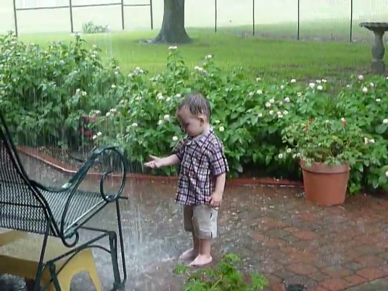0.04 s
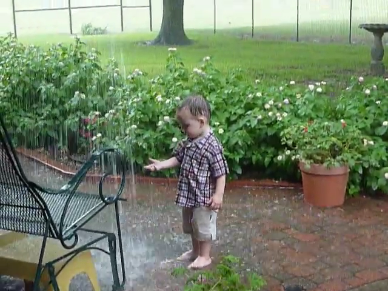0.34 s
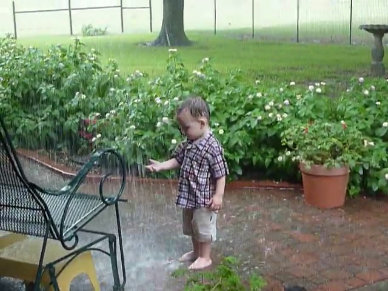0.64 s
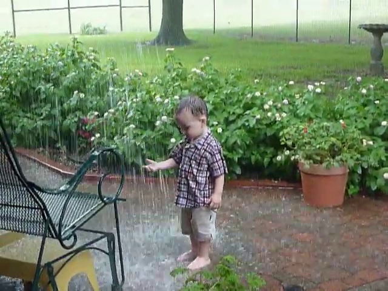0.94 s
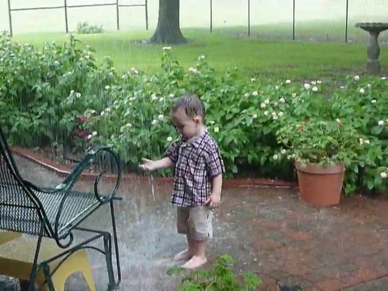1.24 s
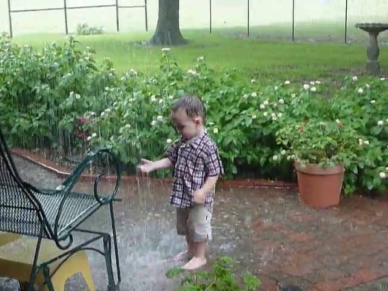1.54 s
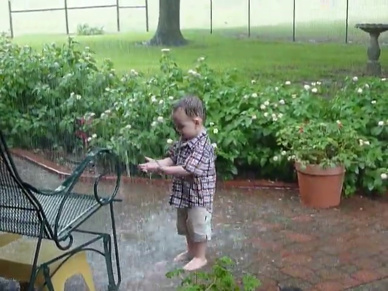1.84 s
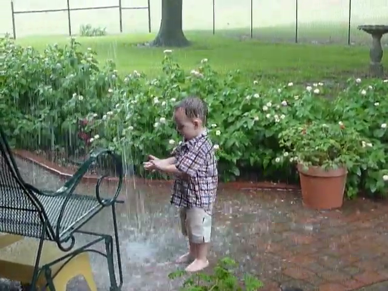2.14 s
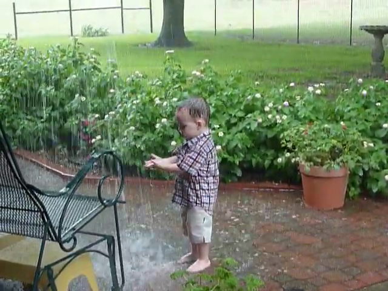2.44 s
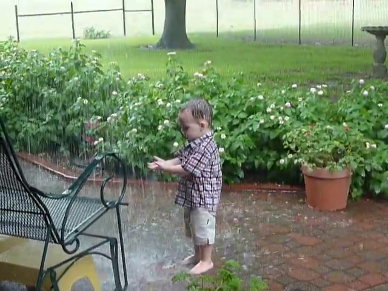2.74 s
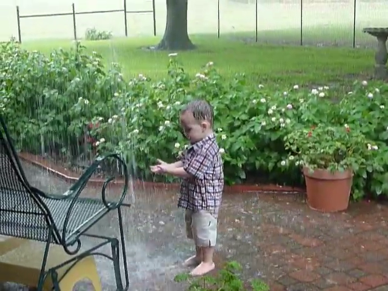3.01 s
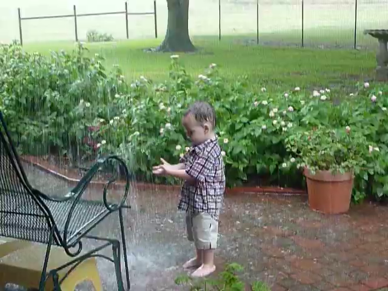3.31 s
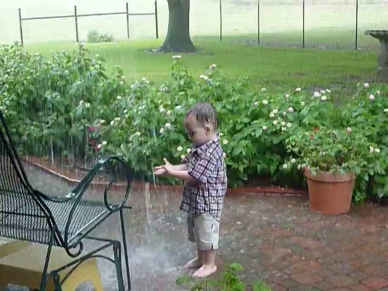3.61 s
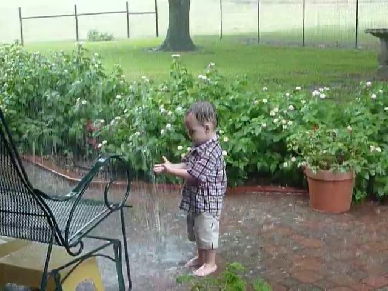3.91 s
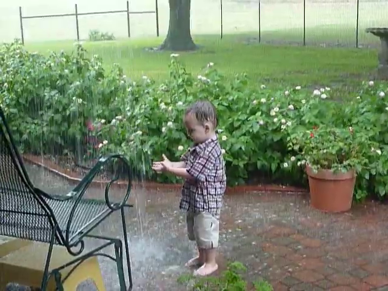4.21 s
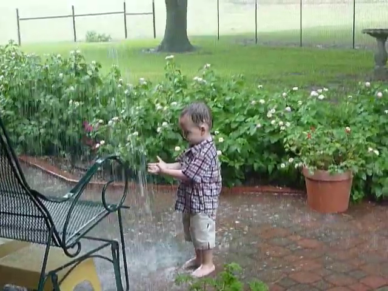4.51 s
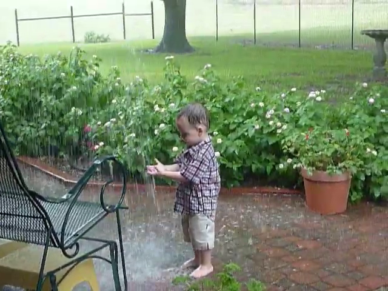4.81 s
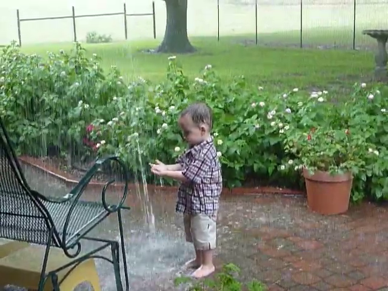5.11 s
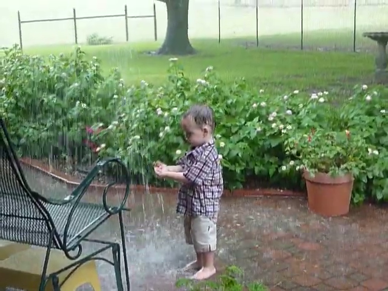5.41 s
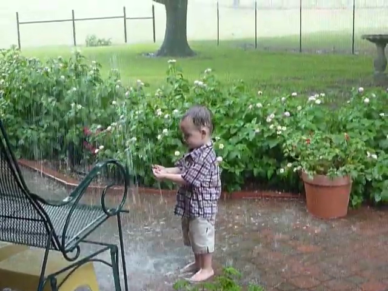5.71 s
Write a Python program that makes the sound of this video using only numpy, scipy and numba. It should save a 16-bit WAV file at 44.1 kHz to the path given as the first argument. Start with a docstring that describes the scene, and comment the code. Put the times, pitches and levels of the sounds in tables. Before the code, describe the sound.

Heavy rain falls on a brick patio and garden plants for about six seconds, making a steady, bright hiss. Close by, roof run-off splatters on the wet bricks in dense ticks and fine spray, while a softer, lower patter on leaves grows slightly over the first few seconds. Fat drops slap sharply at irregular moments throughout, the strongest at about 0.2 and 1.6 seconds, with others standing out near 1.0, 3.4 and 4.7. The splatter eases a little around 2.8 seconds and then recovers. Four small, short plops land in a puddle between 2.4 and 3.4 seconds. The hand-held microphone picks up very faint puffs of wind near 2.4 and 4 seconds, and soft handling bumps at about 3.2, 3.3 and 3.9. The space is open, with almost no echo, and the very highest treble is missing.

```python
"""A brick patio with garden plants in heavy rain; roof run-off splatters on the wet bricks close by.
Each impact is a damped oscillation, a short tick followed by those of its thrown droplets, and a few
big drops plop in a puddle. Countless far drops add incoherently into a hiss. A hand-held camera with
a narrow treble range picks it up, with a little wind and a few soft bumps."""
import sys
import numpy as np
from scipy import signal
from scipy.fft import rfft, irfft
from scipy.io import wavfile
from numba import njit

SR = 44100
rng = np.random.default_rng(int(sys.argv[2]) if len(sys.argv) > 2 else 0)


def wrap_up_sound(samples):
    """Save the sound to the file named by the first command line argument, as 16-bit audio."""
    columns = np.atleast_2d(samples).T
    # keep every value between -1 and 1, then stretch to whole-number steps
    tamed = np.clip(columns, -1, 1)
    steps = np.round(tamed * 32767).astype(np.int16)
    wavfile.write(sys.argv[1], SR, steps)


N = 253615
TIME = np.arange(N) / SR

# spectrum of the far drops' hiss: frequency_hz, relative_density_db
HISS_SPECTRUM = [(35, -44), (60, -22.5), (100, -15.5), (140, -15), (190, -11), (300, -9.5), (520, -11.5),
                 (850, -8), (1500, -7.5), (2200, -6), (3400, -5), (5000, -1), (7400, -2)]
# puffs of air on the microphone: centre_s, level_db, half_width_s
AIR_PUFFS = [(2.36, -59.5, .09), (3.85, -61, .05), (4.15, -66, .3)]
# soft blows on the camera body: start_s, level_db, pitch_hz, swell_s
BODY_BUMPS = [(3.192, -47.5, 90, .014), (3.314, -43.5, 260, 0.0086), (3.91, -40, 95, .016),
              (3.913, -38, 335, 0.016), (3.916, -40.5, 630, 0.011)]
# air pockets ringing in the puddle: start_s, level_db, pitch_hz, decay_s
PUDDLE_PLOPS = [(2.421, -23, 1880, 0.0023), (2.821, -30.5, 1000, .005), (2.994, -28, 1900, 0.0018),
                (3.415, -21.5, 1570, 0.0013)]
# fat drops landing close by: start_s, level_db, pitch_hz
CLOSE_IMPACTS = [(0.106, -18.5, 4440), (0.1798, -10, 3430), (0.1984, -14.5, 3220), (0.3112, -19, 3540),
                 (0.4004, -17.5, 2430), (0.4228, -17, 3850), (0.5083, -17, 6680), (0.597, -19, 4930),
                 (0.7942, -13, 3900), (0.9207, -15, 4120), (0.9951, -12, 6620), (1.297, -13, 5030),
                 (1.5876, -15, 4520), (1.5986, -16.5, 3570), (1.621, -7.5, 7300), (1.854, -13.5, 4500),
                 (2.0834, -19, 3440), (2.1874, -16.5, 3630), (3.194, -14.5, 4350), (3.414, -12, 3500),
                 (3.8653, -15, 3200), (4.0367, -18.5, 2440), (4.3487, -17, 3430), (4.5994, -16.5, 4210),
                 (4.6773, -12, 5870), (5.046, -18, 6400), (5.3532, -17, 4360)]
# resonances of the microphone housing: centre_hz, width_hz, gain_db
HOUSING_MODES = [(895, 120, -18), (1900, 78, -7), (2460, 68, -3.5), (3430, 580, -5.5), (4190, 210, -10)]
# nulls of the camera's treble filter: centre_hz, width_hz
TREBLE_NULLS = [(5399, 470), (7709, 370), (8293, 520)]


def undb(db):
    """Amplitude ratio of a level in decibels."""
    return 10 ** (np.asarray(db) / 20)


def unit(x):
    """Normalisation to rms 1."""
    return x / np.sqrt(np.mean(x ** 2))


def walk(rate_hz):
    """Random modulation with a spread near 1, interpolated between independent values."""
    points = rng.standard_normal(1024)
    return 1.2 * np.interp(TIME * rate_hz, np.arange(len(points)), points)


def hump(centre_s, half_width_s):
    """Gaussian envelope of height 1."""
    return np.exp(-((TIME - centre_s) / half_width_s) ** 2)


def resonate(x, hz, width_hz):
    """Two-pole resonance with gain 1 at its centre."""
    return signal.lfilter(*signal.iirpeak(hz, hz / width_hz, fs=SR), x)


def lowpass(x, hz, order):
    """Maximally flat low-pass filter."""
    return signal.sosfilt(signal.butter(order, hz, fs=SR, output="sos"), x)


@njit
def damped_sines(start_s, hz, decay_s, amplitude):
    """Superposition of free oscillations, each decaying exponentially."""
    out = np.zeros(N)
    for k in range(len(start_s)):
        first = int(start_s[k] * SR)
        pole = np.exp((2j * np.pi * hz[k] - 1 / decay_s[k]) / SR)
        phasor = amplitude[k] + 0j
        for i in range(max(first, 0), min(N, first + int(6 * decay_s[k] * SR))):
            out[i] += phasor.imag
            phasor *= pole
    return out


def splashes(start_s, amplitude, hz, spray_db, decay_cycles, scatter_s, droplets):
    """Primary and secondary impact: a drop ticks, then its droplets land, the later the weaker."""
    out = damped_sines(start_s, hz, decay_cycles / hz, amplitude)
    for k in range(droplets):
        late, detune, sign = rng.random((len(start_s), 3)).T
        landing_s = start_s + scatter_s * (k + .5 + late)
        pitch_hz = np.clip(hz * 2 ** (0.95 * (detune - .5)), 200, 9000)
        weight = np.sign(sign - .5) * undb(spray_db - 2.0 * k)
        out += damped_sines(landing_s, pitch_hz, decay_cycles / pitch_hz, amplitude * weight)
    return out


def shower(count, low_hz, high_hz, spread_db, decay_cycles, spray_db, scatter_s):
    """Shot noise of rms 1: independent splashes at random moments, many small and a few large."""
    when, colour, chance = rng.random((count, 3)).T
    amplitude = undb(spread_db * np.minimum(-np.log(1 - chance), np.pi))
    hz = low_hz * (high_hz / low_hz) ** colour
    return unit(splashes(when * N / SR, amplitude, hz, spray_db, decay_cycles, scatter_s, droplets=3))


def rain_strength():
    """Slow modulation: the run-off eases once and recovers; the garden patter grows and levels off."""
    bricks_db = -30.5 - 0.9 * hump(centre_s=2.8, half_width_s=0.72)
    garden_db = -42 - 3.5 * np.exp(-TIME / 2.0)
    return bricks_db, garden_db


def far_hiss(bricks_db, garden_db):
    """Incoherent summation blurs far drops into noise: lows from the leaves, highs from the bricks."""
    top_hz, crossover_hz = 9125, 1400
    hz = np.maximum(np.arange(N // 2 + 1) * SR / N, 1)
    points_hz, density_db = np.transpose(HISS_SPECTRUM)
    colour = undb(np.interp(np.log(hz), np.log(points_hz), density_db)) * (hz < top_hz)
    noise = irfft(rfft(rng.standard_normal(N)) * colour, N)
    spectrum = rfft(unit(noise))
    half_octave = np.round(2 * np.log2(hz))
    bricks_swell_db, garden_swell_db = bricks_db - bricks_db.mean(), garden_db - garden_db.mean()
    out = 0
    for k in np.unique(half_octave[(hz > 20) & (hz < top_hz)]):
        brick_share = np.clip(k / 2 - np.log2(crossover_hz), 0, 1)
        swell_db = brick_share * bricks_swell_db + (1 - brick_share) * garden_swell_db
        flicker_db = .6 * walk(35)
        out = out + irfft(spectrum * (half_octave == k), N) * undb(swell_db + flicker_db)
    return out * undb(-31.5)


def wind():
    """Pressure fluctuations of light air rumble on the microphone and swell in a few puffs."""
    breeze = undb(-75)
    puffs = sum(undb(db) * hump(centre_s, half_width_s) for centre_s, db, half_width_s in AIR_PUFFS)
    rumble = resonate(lowpass(rng.standard_normal(N), 90, order=2), hz=60, width_hz=60)
    return unit(rumble) * (breeze + puffs) * undb(2 * walk(9))


def bumps():
    """Heavy damping: soft blows on the camera body swell and die without a clear note."""
    out = 0
    for start_s, db, hz, swell_s in BODY_BUMPS:
        age = np.maximum(TIME - start_s, 0) / swell_s
        width_hz = 0.81 * hz
        noise_band = resonate(rng.standard_normal(N), hz, width_hz)
        thud = unit(resonate(noise_band, hz, width_hz))
        out = out + thud * undb(db) * age * np.exp(1 - age)
    return out


def patio_echo(x, t60_s, wet_db):
    """Reverberation: the house wall and eaves scatter a short tail behind every drop."""
    t = TIME[:SR // 4]
    tail = rng.standard_normal(len(t)) * undb(-60 * t / t60_s) * (t > .003)
    return x + undb(wet_db) * signal.fftconvolve(x, tail / np.linalg.norm(tail))[:N]


def leaves(garden_db):
    """Strongly damped impacts: rain on leaves patters lower and softer than on brick."""
    patter = shower(2600, 717, 2300, spread_db=1.5, decay_cycles=1.3, spray_db=-10.5, scatter_s=.002076)
    return patter * undb(garden_db - 4.0)


def plops():
    """Cavity resonance: big drops open air pockets in the puddle, each with two quickly damped rings."""
    start_s, db, hz, decay_s = np.array(PUDDLE_PLOPS, float).T.copy()
    first_ring = damped_sines(start_s, hz, decay_s, undb(db))
    second_ring = damped_sines(start_s + .002, hz * 0.84, decay_s, undb(db - 4))
    return first_ring + second_ring


def close_drops():
    """Impact transients: a fat drop slaps, and the harder it lands, the more it cracks and sprays."""
    start_s, db, hz = np.array(CLOSE_IMPACTS, float).T.copy()
    force_db = db + 15  # excess over an ordinary fat drop
    crack_db = -3 + 0.59 * force_db
    spray_db = -4.5 + .35 * force_db
    crack_hz, crack_decay_s = np.full(len(db), 6530.), np.full(len(db), .00035)
    crack = damped_sines(start_s + .0003, crack_hz, crack_decay_s, undb(db + crack_db))
    splash = splashes(start_s, undb(db - 2), hz, spray_db, decay_cycles=3.2, scatter_s=.001, droplets=6)
    return crack + splash


def splatter(bricks_db):
    """Impacts on a rigid surface: run-off slaps the bricks among smaller drops and throws up fine spray."""
    slaps = shower(260, 2770, 4940, spread_db=2.1, decay_cycles=1.7, spray_db=-6, scatter_s=.002)
    ticks = shower(1500, 2870, 5240, spread_db=5.0, decay_cycles=1.9, spray_db=-8, scatter_s=.0015)
    spray = shower(1100, 5450, 8900, spread_db=4.5, decay_cycles=2.6, spray_db=-3.5, scatter_s=.0012)
    ticks *= undb(-13 + 0.47 * walk(30))
    spray *= undb(-5.5 + walk(30))
    return undb(bricks_db) * (slaps * undb(-11.5) + ticks + spray)


def scene():
    """Superposition of near drops in the patio's echo, the far hiss and the noises at the camera."""
    bricks_db, garden_db = rain_strength()
    near = splatter(bricks_db) + leaves(garden_db) + close_drops() + plops()
    near = near - lowpass(near, 710, order=1)  # small splashes radiate little bass
    near = patio_echo(near, t60_s=0.044, wet_db=-12)
    return (near + far_hiss(bricks_db, garden_db) + wind() + bumps())[None]


def record(dry):
    """Housing resonance colours the sound; the camera's filter cuts narrow nulls and removes the top."""
    x = dry + sum(undb(db) * resonate(dry, hz, width_hz) for hz, width_hz, db in HOUSING_MODES)
    for hz, width_hz in TREBLE_NULLS:
        x = x - resonate(x, hz, width_hz)
    x = lowpass(x, 8080, order=28)
    return signal.sosfilt(signal.ellip(10, .2, 80, 9125, fs=SR, output="sos"), x)


dry = scene()
out = record(dry)
wrap_up_sound(out)
```